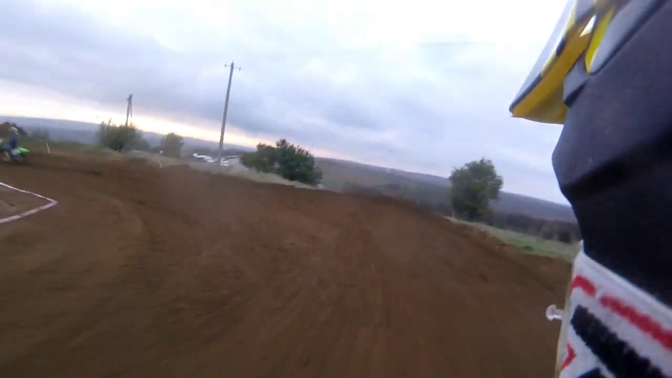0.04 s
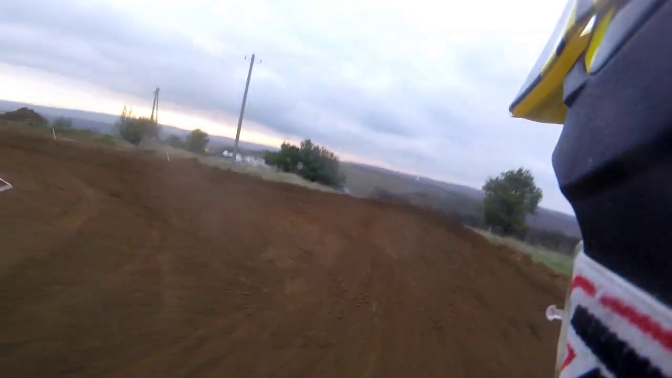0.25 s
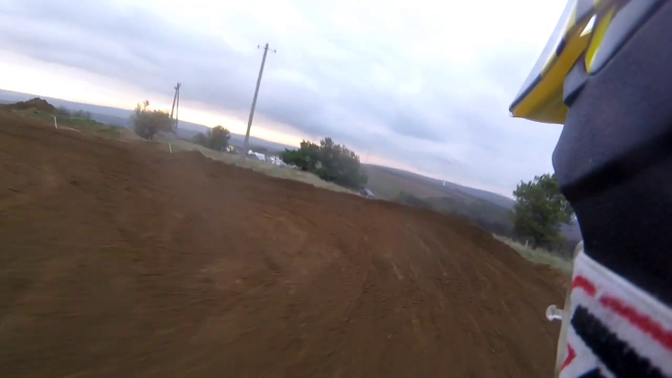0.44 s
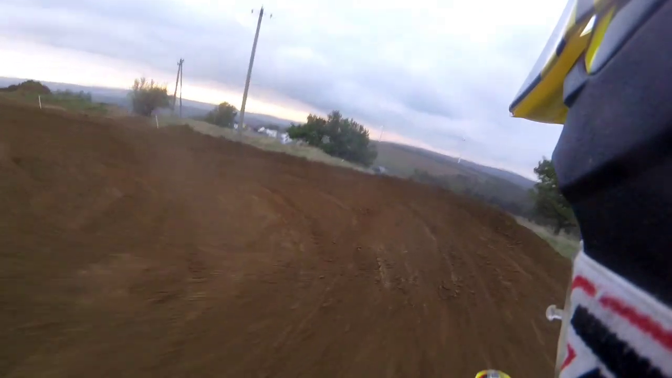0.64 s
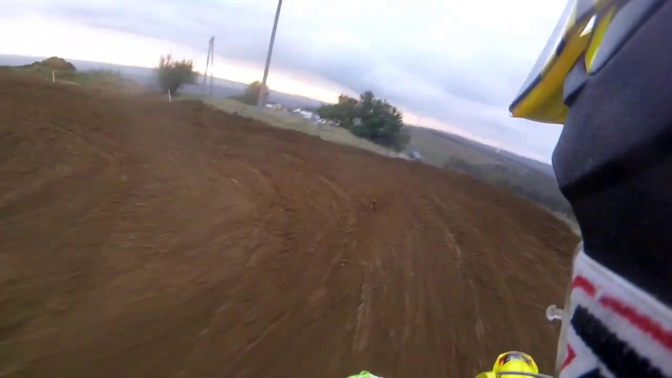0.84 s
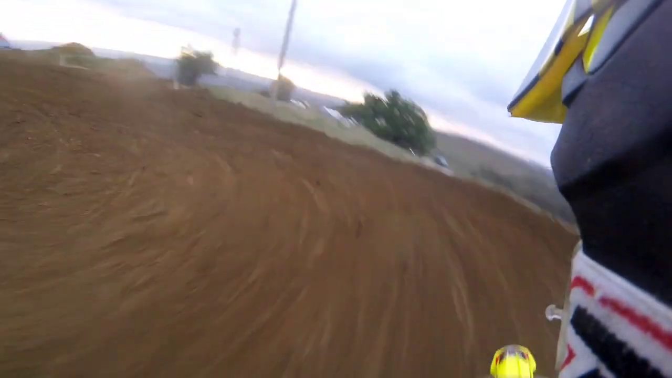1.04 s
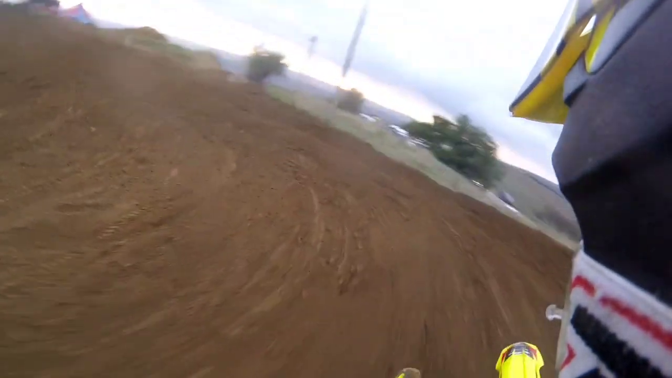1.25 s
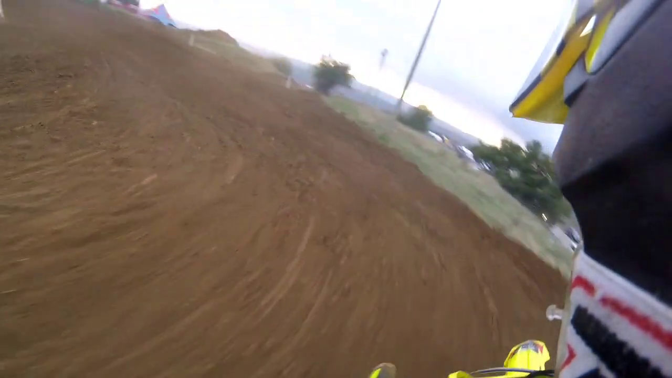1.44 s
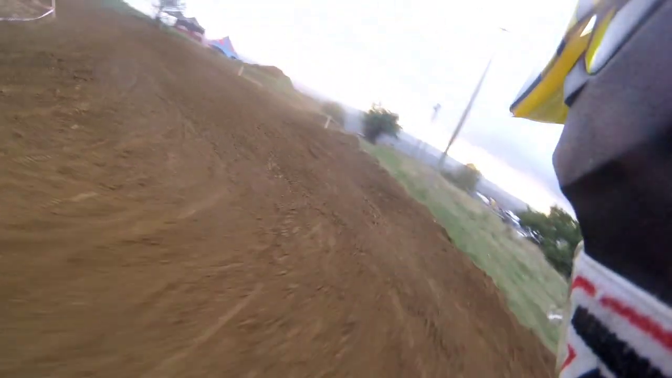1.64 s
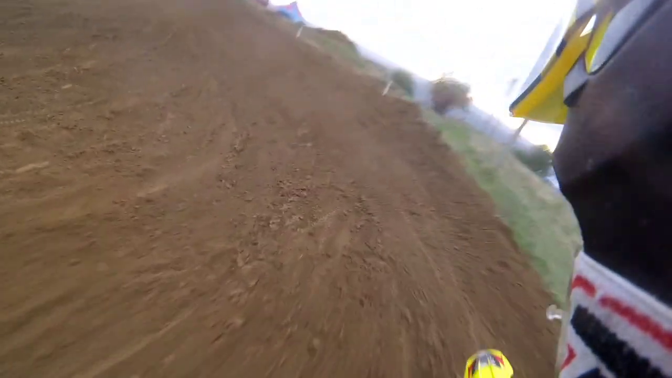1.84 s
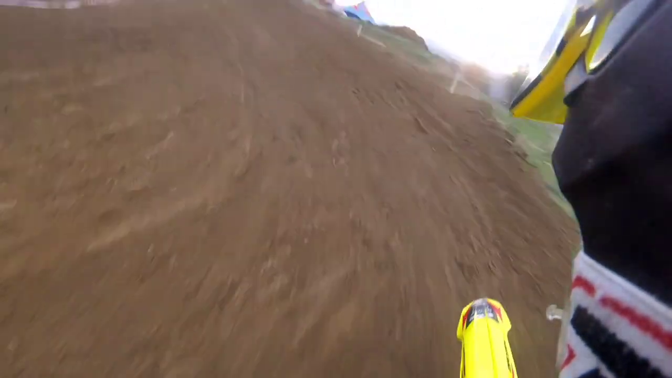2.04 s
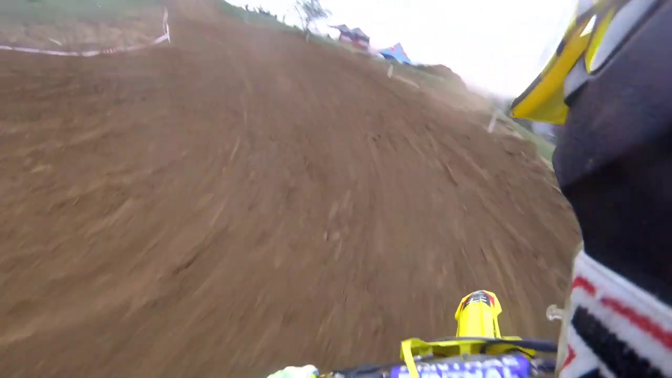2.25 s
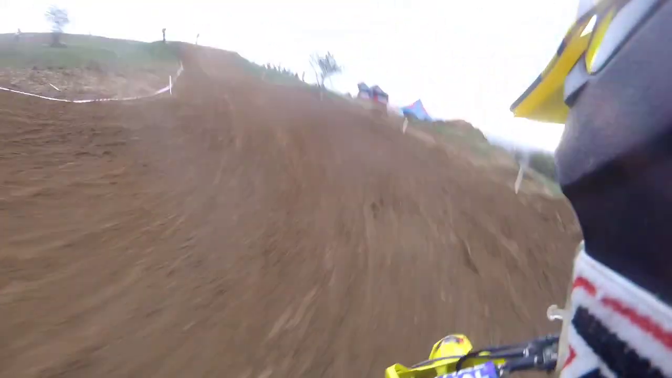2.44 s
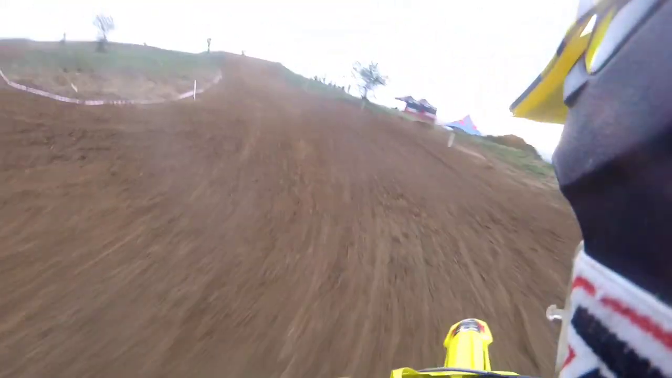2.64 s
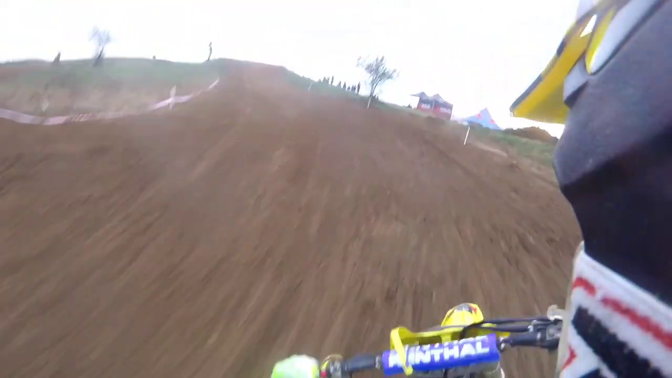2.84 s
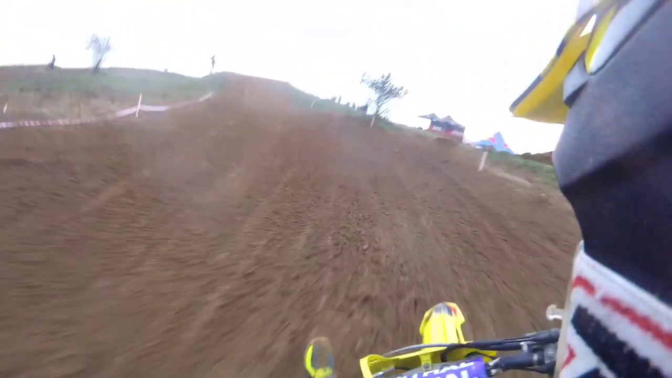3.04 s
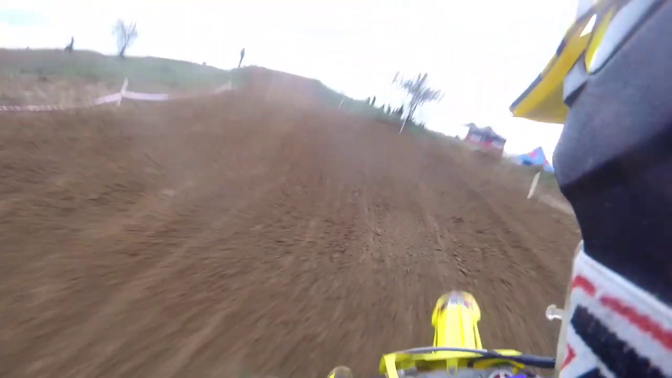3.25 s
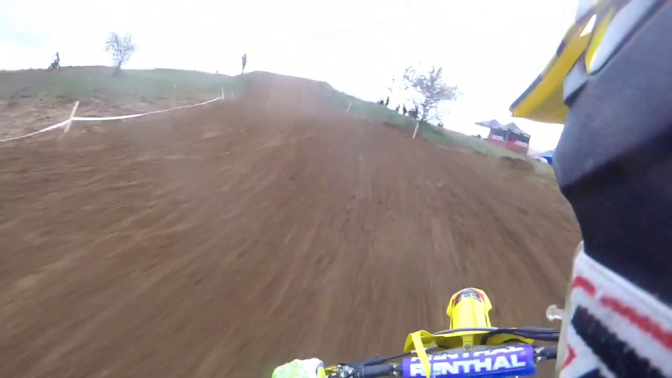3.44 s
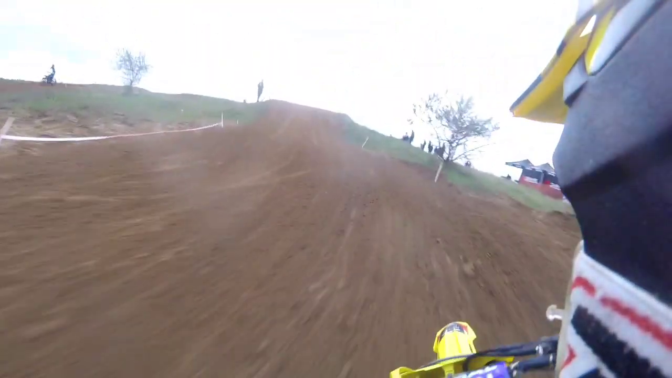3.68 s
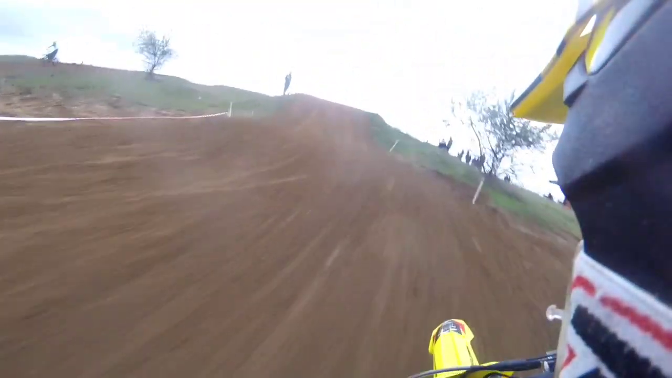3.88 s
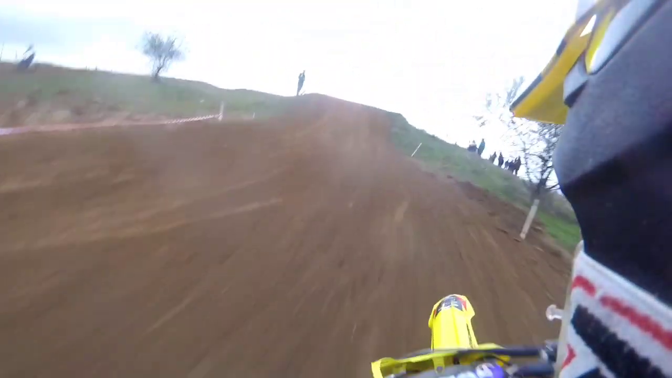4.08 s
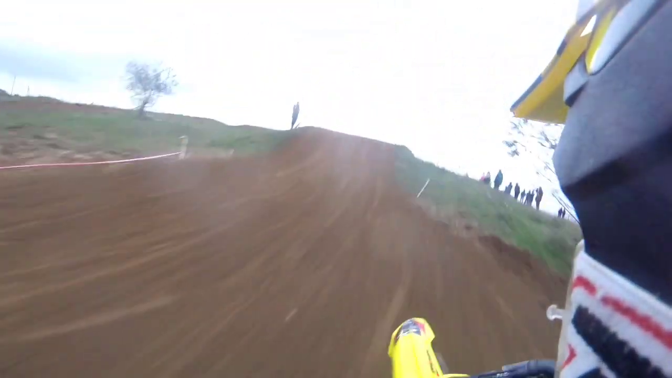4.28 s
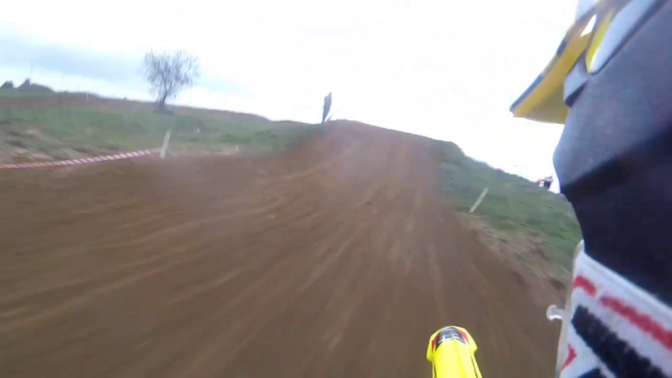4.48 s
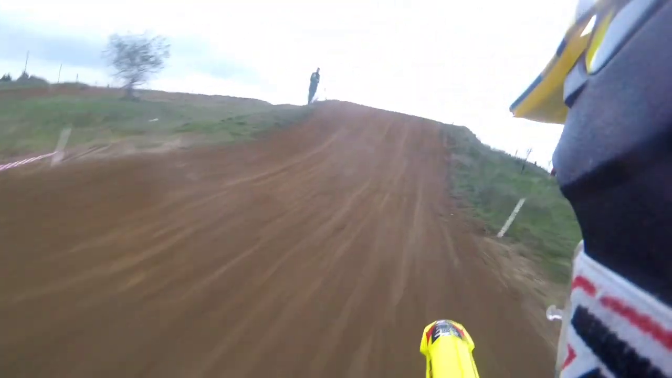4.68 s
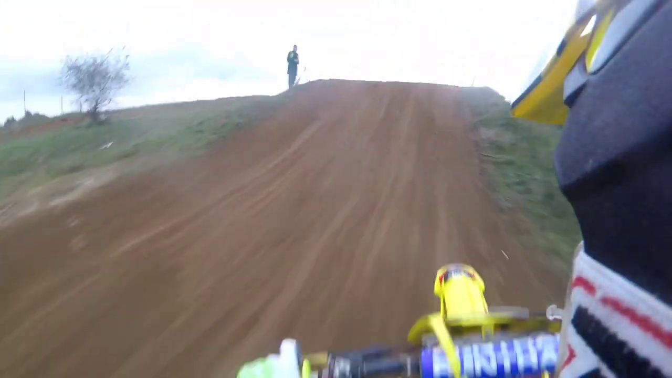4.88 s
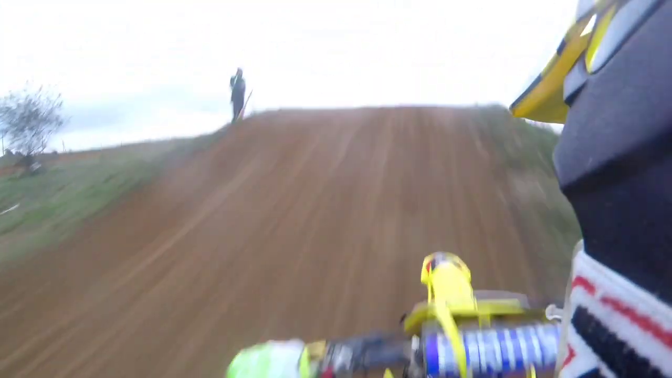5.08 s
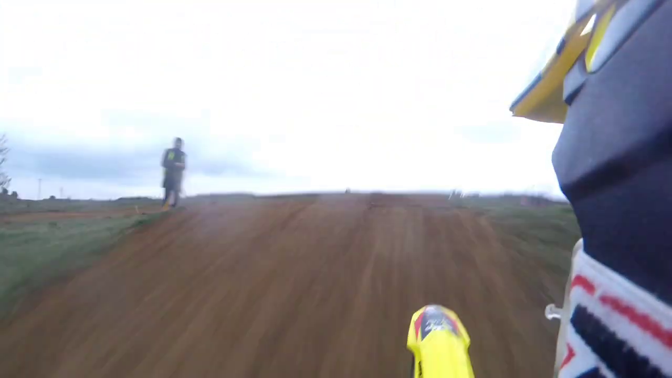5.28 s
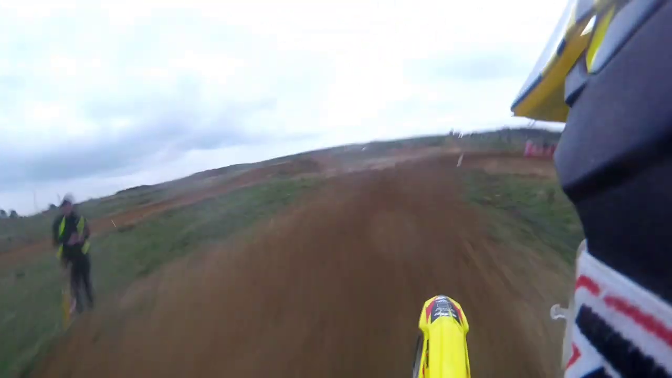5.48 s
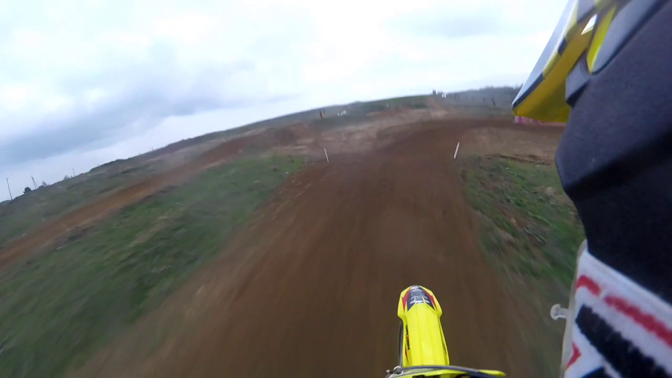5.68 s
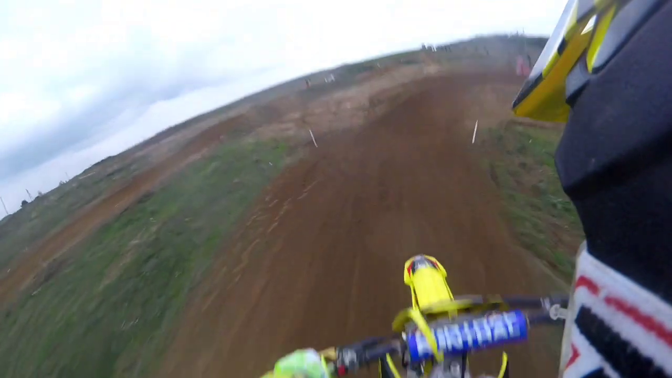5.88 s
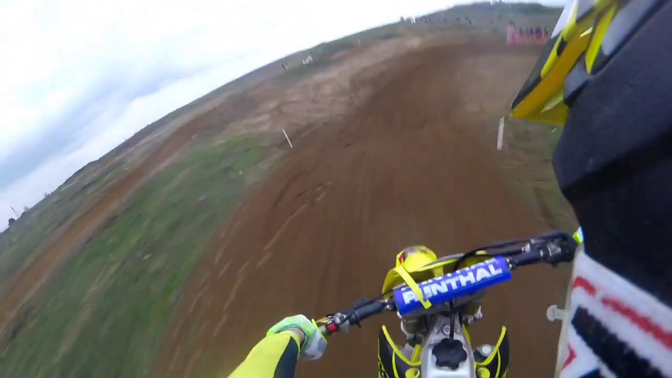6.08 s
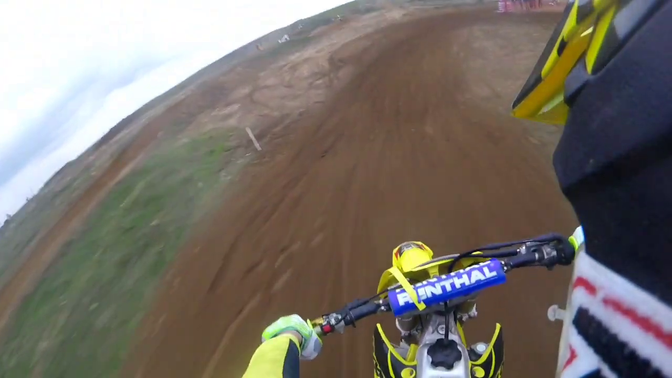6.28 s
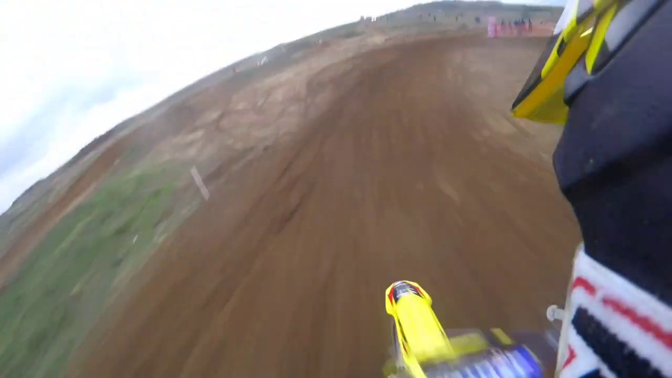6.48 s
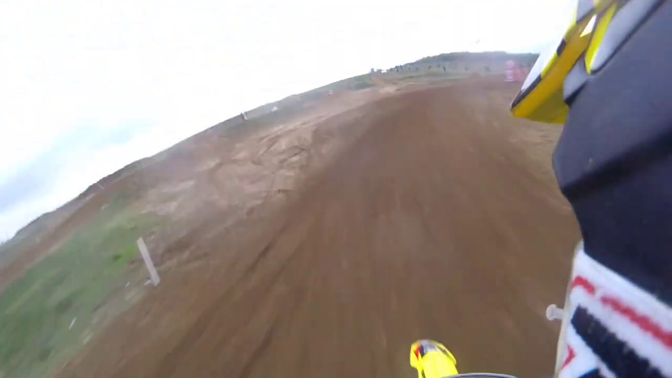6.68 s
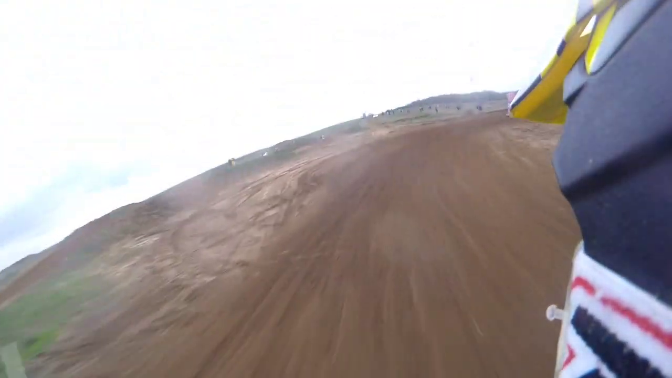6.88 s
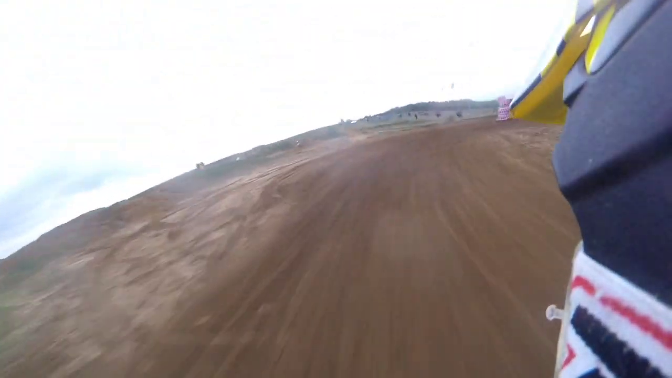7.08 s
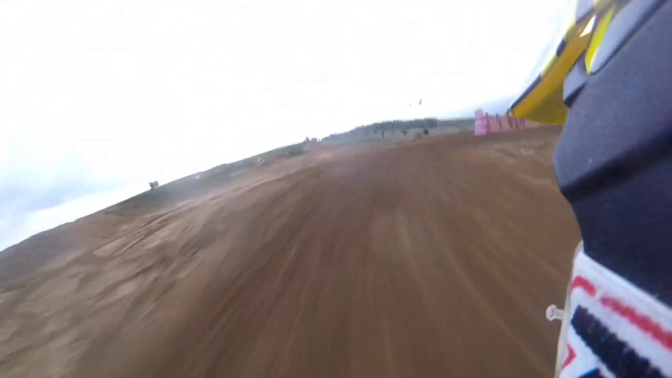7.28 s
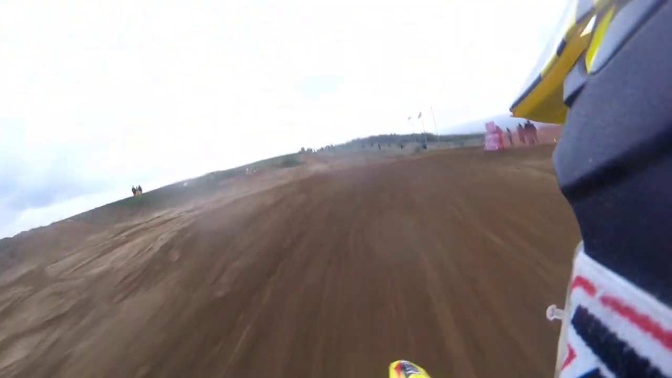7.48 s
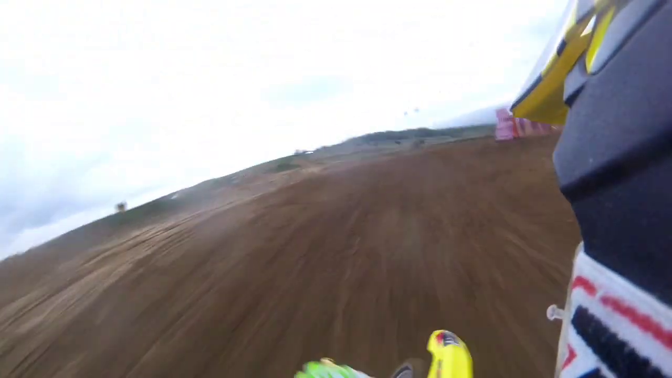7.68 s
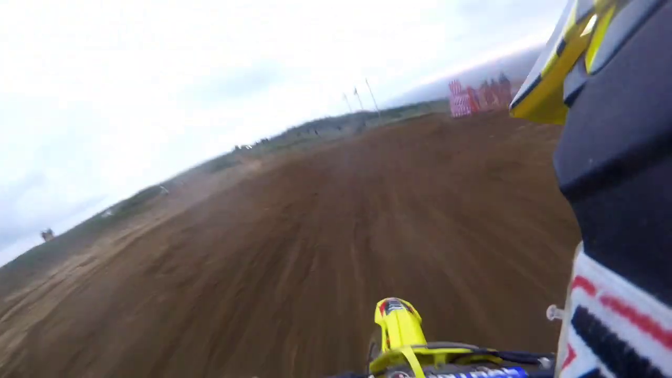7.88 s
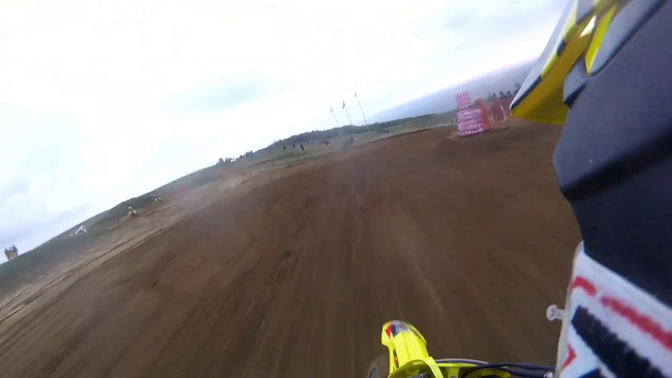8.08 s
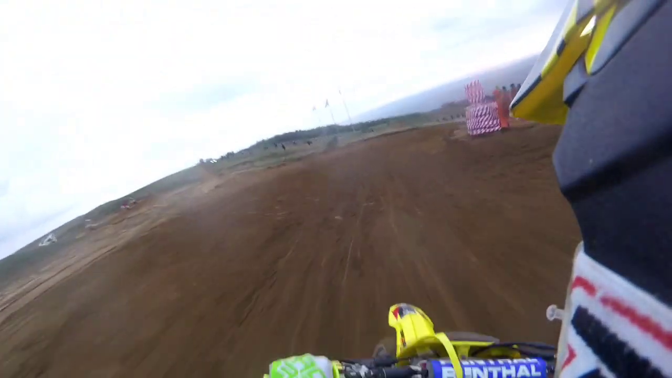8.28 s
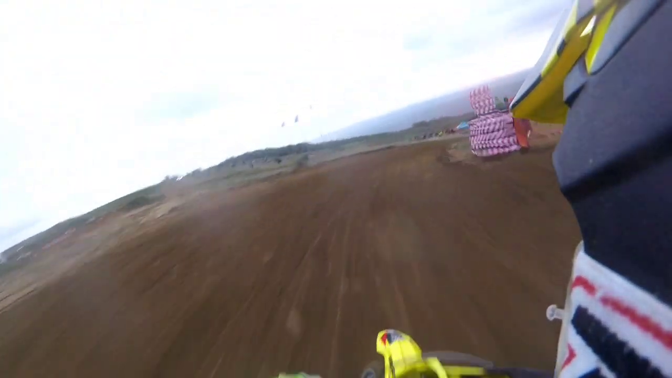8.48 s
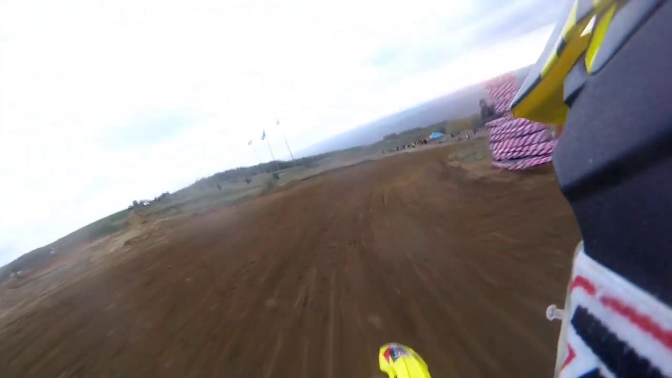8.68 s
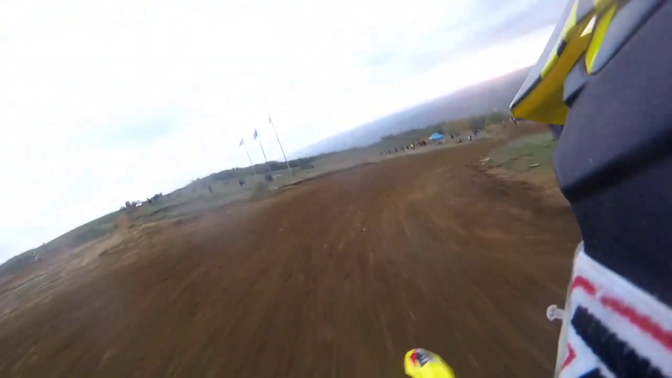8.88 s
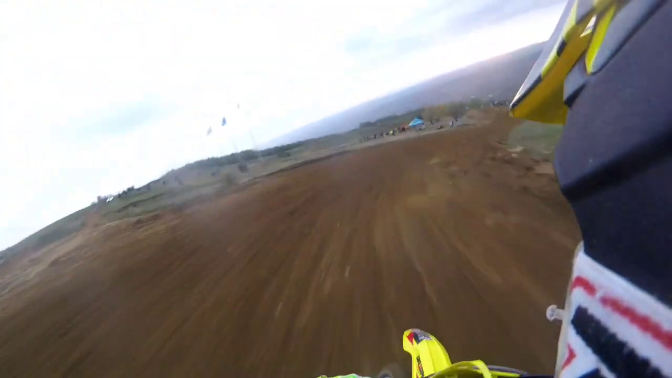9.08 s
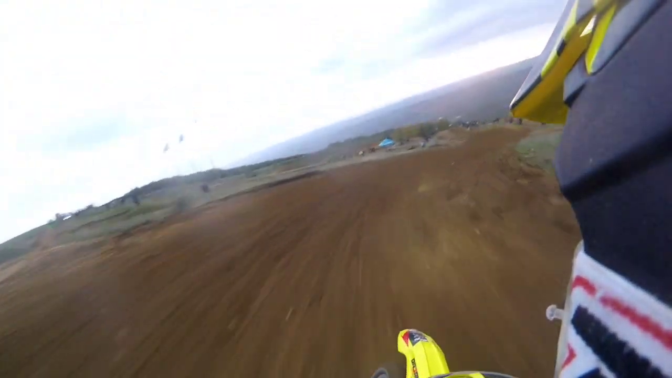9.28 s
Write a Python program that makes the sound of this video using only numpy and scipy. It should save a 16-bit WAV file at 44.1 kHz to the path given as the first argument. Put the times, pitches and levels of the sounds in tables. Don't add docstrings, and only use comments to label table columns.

```python
import sys
import numpy as np
from scipy import signal
from scipy.fft import rfft, irfft, next_fast_len
from scipy.io import wavfile
from scipy.ndimage import uniform_filter1d

SR = 44100
rng = np.random.default_rng(int(sys.argv[2]) if len(sys.argv) > 2 else 0)


def gain_from_db(level_db):
    decades = np.asarray(level_db, float) / 20
    return 10 ** decades


def dump(signal):
    limited = np.clip(np.atleast_2d(signal).T, -1, 1)
    pcm = np.round(limited * 32767).astype(np.int16)
    wavfile.write(sys.argv[1], SR, pcm)


N = 411453
T_S = np.arange(N) / SR


def noise():
    return rng.standard_normal(N)


def rms_one(x):
    return x / np.sqrt(np.mean(x ** 2) + 1e-20)


def at_peak(x, peak_db):
    return x * gain_from_db(peak_db) / x.max()


def evened(x, span_s=0.099):
    span = int(span_s * SR)
    power = uniform_filter1d(uniform_filter1d(x ** 2, span), span)
    return x / np.sqrt(np.abs(power) + 1e-12)


def in_time(rows):
    s, *columns = np.transpose(rows)
    return [np.interp(T_S, s, c) for c in columns]


def colour(x, spectrum):
    size = next_fast_len(N)
    hz = np.arange(size // 2 + 1) * SR / size + 1
    points = np.array(spectrum)
    gain_db = np.interp(np.log(hz), np.log(points[:, 0]), points[:, 1], left=-90, right=-90)
    return rms_one(irfft(rfft(x, size) * gain_from_db(gain_db), size)[:N])


def band(x, low_hz, high_hz, order=2):
    sos = signal.butter(order, [low_hz, high_hz], "band", fs=SR, output="sos")
    return signal.sosfilt(sos, x + 1e-18)


def centred(x, low_hz, high_hz, order=1):
    return band(band(x, low_hz, high_hz, order)[::-1], low_hz, high_hz, order)[::-1]


def muffled(x):
    return signal.sosfilt(signal.butter(3, 2500, fs=SR, output="sos"), x)


def resonance(x, hz, width_hz):
    r = np.exp(-np.pi * width_hz / SR)
    poles = [1, -2 * r * np.cos(2 * np.pi * hz / SR), r * r]
    return signal.lfilter([(1 - r * r) / 2, 0, (r * r - 1) / 2], poles, x + 1e-18)


def rung(x, hz, width_hz, second_width_hz):
    return resonance(resonance(x, hz, width_hz), hz, second_width_hz)


def drift(rate_hz):
    r = np.exp(-40 * np.pi * rate_hz / SR)
    slow = signal.lfilter([1], [1, -2 * r, r * r], rng.standard_normal(N // 20 + 4002))[4000:]
    return np.interp(np.arange(N) / 20, np.arange(len(slow)), rms_one(slow))


def pulses(cycles, uneven_db):
    passed = np.diff(np.floor(np.maximum.accumulate(cycles)), prepend=-1) > 0
    return passed * gain_from_db(uneven_db * drift(33))


def puffs(clicks, decay_s):
    return signal.lfilter([1], [1, -np.exp(-1 / (decay_s * SR))], clicks + 1e-18)


def struck(events):
    clicks = np.zeros(N)
    clicks[[round(s * SR) for s, db in events]] = gain_from_db(np.array(events)[:, 1])
    return clicks


def loudest_db(events):
    return max(db for s, db in events)


def speed_excess(per_s):
    return np.minimum(per_s, 72.0) - 60.0


# (dip time [s], dip speed [firings/s], peak time [s], peak speed [firings/s])
SPEED_SWINGS = [(0, 34.8, .165, 67.53), (.7, 32.68, .85, 38.39), (.97, 38.67, 1.15, 57.79),
                (1.513, 35.53, 1.871, 75.23), (2.054, 61.57, 2.169, 68.68), (2.469, 47.07, 2.754, 63.11),
                (2.894, 47.59, 3.246, 69.43), (3.47, 48.54, 3.71, 61.09), (3.805, 61.13, 4.13, 70.97),
                (4.25, 70.53, 4.354, 86.46), (4.473, 84.17, 4.714, 94.05), (4.847, 80.8, 4.929, 85.5),
                (5.015, 75.37, 5.055, 76.14), (5.11, 73.9, 5.601, 72.65), (5.921, 60.2, 6.0, 60.01),
                (6.06, 59.9, 6.381, 74.79), (6.398, 79.3, 6.584, 83.87), (6.75, 76.5, 6.8, 75),
                (8.0, 63, 8.13, 67), (9.2, 66, 9.34, 66)]


def speed():
    s, per_s = np.reshape(SPEED_SWINGS, (-1, 2)).T
    place = np.interp(T_S, s, np.arange(len(s)))
    k = np.minimum(place.astype(int), len(s) - 2)
    part, middle_s = place - k, (s[:-1] + s[1:]) / 2
    is_open = np.any([(middle_s > row[0]) & (middle_s < row[1]) for row in THROTTLE_TWISTS], axis=0)
    coasting = ~is_open & (np.diff(per_s) < 0)
    quick_drop = (part + np.sin(np.pi / 2 * part)) / 2
    smooth = (1 - np.cos(np.pi * part)) / 2
    return per_s[k] + np.where(coasting[k], quick_drop, smooth) * np.diff(per_s)[k]


# (open [s], shut [s], blow level [dB], pipe ring level [dB], ring level on the overrun after [dB])
THROTTLE_TWISTS = [(0, .165, -29.5, -17, -15), (.99, 1.13, -34, -29, -17.5), (1.36, 1.36, -50, -30, -25),
                   (1.57, 1.72, -32.5, -22, -19), (1.72, 1.895, -31.5, -25, -19),
                   (2.06, 2.21, -33.5, -17, -22), (2.21, 2.36, -34.5, -21, -22),
                   (2.36, 3.25, -34.5, -16, -22), (3.6, 3.84, -41, -18.5, -18),
                   (3.84, 4.76, -35.5, -13.5, -15), (4.76, 5.24, -42, -15, -23),
                   (6.25, 6.62, -47, -27, -28), (6.8, 7.22, -50, -31, -31), (7.45, 7.95, -50, -31, -28),
                   (7.99, 8.45, -47, -30, -34), (8.95, 9.4, -50, -33, -33)]


def throttle():
    roll_on_s, roll_on_db, twist_s = .07, -9, .05
    braking_per_s2, coast_db = 85.0, -15
    per_s, rows = speed(), np.array(THROTTLE_TWISTS)
    latest = np.maximum(np.searchsorted(rows[:, 0], T_S, "right") - 1, 0)
    _, shut_s, blow_db, ring_db, overrun_db = rows[latest].T
    is_open, fast = T_S < shut_s, speed_excess(per_s)
    blow_db = blow_db + roll_on_db * (1 - puffs(is_open, roll_on_s) / (roll_on_s * SR))
    braking = np.clip(-np.gradient(per_s) * SR / braking_per_s2, 0, 1)
    boom_db = np.where(is_open, ring_db, overrun_db + coast_db * (1 - braking) ** 2)
    bark_db = np.where(is_open, blow_db + 12 - .15 * fast, -42.5)
    crack_db = np.where(is_open, blow_db + .27 * fast, -57)
    wrist = int(twist_s * SR)
    return [per_s] + [uniform_filter1d(1. * c, wrist) for c in (is_open, boom_db, bark_db, crack_db)]


# (time [s], lag after firing [cycles])
INTAKE_LAG = [
    (0, .22),
    (1.62, .215),
    (1.75, .255),
    (1.9, .262),
    (2.05, .226),
    (4.25, .226),
    (4.4, .283),
    (6.3, .303),
]


def blows(per_s):
    lag = in_time(INTAKE_LAG)[0] + .0011 * (speed_excess(per_s) + 2)
    strength = 1 - .4 * np.clip((per_s - 68) / 10, 0, 1)
    cycles = np.cumsum(per_s) / SR - .0235 * per_s[0] + .0015 * drift(25)
    firing = pulses(cycles, uneven_db=1.0)
    intake = pulses(cycles - lag, uneven_db=.5) + .45 * pulses(cycles - 2 * lag, uneven_db=.5)
    both = firing + strength * intake
    share = .8 * np.clip((per_s - 50) / 15, 0, 1)
    overlap = np.diff(np.floor(cycles - .77), prepend=-2) > 0
    kicks = (1 - share) * (firing + both) / 2 + share * overlap
    return firing, both, kicks


def pipe_boom(firing, kicks, boom_db, crack_db):
    cold_hz, hot_hz = 159, 274
    hot = np.clip((crack_db - boom_db + 31) / 8, 0, 1) * np.clip((boom_db + 30) / 12, .2, 1)
    cold_ring = evened(rung(firing, cold_hz, 80, 140))
    hot_ring = evened(centred(resonance(kicks, hot_hz, 130), 165, 380, order=2))
    return gain_from_db(boom_db + 2.5) * (np.sqrt(1 - hot) * cold_ring + np.sqrt(hot) * hot_ring)


def exhaust_crack(per_s, firing, both, crack_db):
    spike = centred(firing + .35 * (both - firing), 450, 4000)
    spike = muffled(muffled(spike)[::-1])[::-1]
    spike = rms_one(spike) + .6 * rms_one(resonance(spike, 1480, 400))
    sharp = np.clip((per_s - 46) / 16, 0, 1)
    rounded = evened(centred(spike, 400, 2000))
    return gain_from_db(crack_db + 7) * (sharp * evened(spike) + (1 - sharp) * rounded)


# (time [s], low thump [dB], bark [dB], howl [dB], tailpipe ring [dB])
LOAD_VOICE = [(0, -2, -2, -7, -13), (.9, 0, -1, -10, -20), (1.55, -5, -1.5, -9, -20),
              (1.75, 1, -2, -7, -16), (1.9, 2, -2, -6, -16), (2.05, 0, -1, -9, -18),
              (2.3, -2, -.5, -12, -14), (3.25, -2, -1, -13, -14), (4.0, 0, -4, -8, -11),
              (5.3, 0, -4, -8, -12), (6.2, 3, -1, -2, -12), (6.35, 8, 3, 2.5, -4), (6.6, 8, 3, 2.5, -4),
              (6.8, 0, 2, -3, -16), (9.33, 0, 2, -3, -16)]


def exhaust(per_s, boom_db, bark_db, crack_db):
    firing, both, kicks = blows(per_s)
    low_db, mid_db, howl_db, tail_db = in_time(LOAD_VOICE)
    boom = pipe_boom(firing, kicks, boom_db, crack_db)
    suction = -np.roll(firing, round(.0027 * SR))
    thump = gain_from_db(bark_db + 4.5 + low_db) * evened(centred(suction, 35, 175))
    bark = evened(centred(resonance(both, 520, 400), 400, 670, order=2))
    bark = gain_from_db(bark_db + 2.5 + mid_db) * bark
    howl = evened(centred(resonance(both, 790, 300), 660, 1000, order=2))
    howl = gain_from_db(bark_db + 2.5 + howl_db) * howl
    tail = gain_from_db(crack_db + tail_db) * evened(rung(firing, 2680, 250, 350))
    crack = exhaust_crack(per_s, firing, both, crack_db)
    body = np.roll(boom + thump + bark + howl, -round(.0002 * SR))
    gas_gate = gain_from_db(crack_db) * evened(puffs(puffs(firing, 0.015), 0.00015))
    return body + crack + tail, gas_gate


# (start [s], length [s], flap level [dB], rumble level [dB])
GUSTS_ON_PORT = [(0, 0.25, -20, -34), (0.22, 0.55, -24, -23.5), (0.835, 0.42, -20.5, -24),
                 (1.25, 0.14, -29, -26.5), (1.61, 0.097, -28, -38), (1.72, .2, -23, -21),
                 (1.88, 0.19, -21, -33), (2.162, 0.46, -24, -18.5), (2.48, 0.14, -18, -17.5),
                 (2.6, 0.26, -17, -23.5), (2.794, 0.32, -16.5, -25.5), (3.136, 0.3, -16.5, -21),
                 (3.481, 0.3, -15.5, -19), (3.696, 0.36, -14.5, -27), (4.124, 0.71, -17, -26),
                 (4.246, 0.14, -17, -21), (4.887, 0.27, -18.5, -21), (5.222, 0.16, -15, -18.5),
                 (5.43, 0.33, -17, -19.5), (5.787, 0.21, -23, -23.5), (6.002, 0.17, -27, -28),
                 (6.16, 0.14, -25, -23.5), (6.576, 0.17, -23, -33), (6.79, 0.098, -12.5, -19.5),
                 (6.898, 0.15, -15.5, -24), (7.068, 0.161, -14.5, -22), (7.26, .3, -15.5, -23.5),
                 (7.572, 0.22, -16, -20), (7.811, .15, -16, -19.5), (8.058, .08, -29.5, -28.5),
                 (8.142, 0.055, -24, -30), (8.211, 0.042, -18, -28), (8.298, 0.079, -16, -24.5),
                 (8.418, 0.078, -18.5, -23.5), (8.546, 0.23, -17, -25), (8.751, 0.17, -23, -26),
                 (8.966, 0.17, -19, -28), (9.218, .2, -16.5, -18)]


def gusts():
    calm_db, rise_db_per_s, fall_db_per_s = -34, 250.0, 300.0
    t, out = T_S[::32], calm_db
    for s, length_s, *db in GUSTS_ON_PORT:
        before_s, after_s = np.maximum(s - t, 0), np.maximum(t - s - length_s, 0)
        out = np.maximum(out, np.c_[db] - rise_db_per_s * before_s - fall_db_per_s * after_s)
    return [np.interp(T_S, t, row) for row in out]


# (frequency [Hz], density [dB per Hz])
RUMBLE_SPECTRUM = [(15, -44), (25, -9.5), (40, -8.5), (65, -2.5), (110, -5.5), (150, -15), (250, -41.5)]
FLAP_SPECTRUM = [(70, -25.5), (110, -3.5), (160, 1), (240, -1), (400, -6.5), (700, -17), (1200, -39)]
ROAR_SPECTRUM = [(250, -22.5), (450, 3.5), (800, -1.5), (1400, -7.5), (2000, -13), (2900, -20.5),
                 (3900, -28), (5000, -29), (6000, -55)]
# (time [s], roar against flap [dB])
HELMET_FACING = [(0, -15.5), (.33, -9.5), (.45, -17), (1.0, -25), (1.47, -14.5), (1.7, -13.5), (2.5, -18),
                 (3.55, -19.5), (4.2, -14.5), (5.38, -14), (5.45, -23), (6.1, -20), (6.75, -17), (8.0, -14),
                 (9.33, -14.5)]


def wind(gas_gate, crack_db, flap_db, rumble_db, gust_db):
    facing_db, = in_time(HELMET_FACING)
    roar_db = 20 * np.log10(np.hypot(gain_from_db(flap_db + facing_db), gain_from_db(crack_db - 8)))
    eddies = colour(noise(), FLAP_SPECTRUM)
    flap = evened(band(np.expm1(0.3 * eddies), 55, 3500, order=1), 0.069)
    rumble = evened(colour(noise(), RUMBLE_SPECTRUM), 0.14)
    rumble = gain_from_db(rumble_db + 5.5 + 0.58 * gust_db) * rumble
    flare = gain_from_db(flap_db - 27 + gust_db) * np.exp(0.68 * eddies) + gain_from_db(9.0) * gas_gate
    roar = evened(band(flare * colour(noise(), ROAR_SPECTRUM), 272, 4060), 0.019)
    passing = swell_passing()
    flap = flap * (1 - .7 * passing)
    roar = roar * (1 + .6 * passing)
    return rumble + gain_from_db(flap_db + gust_db + 3.5) * muffled(flap) + gain_from_db(roar_db + 9.0) * roar


# (time [s], level [dB])
HISS_LEVEL = [(0, -58.5), (.39, -63), (.45, -70), (.99, -53.5), (1.15, -47.5), (1.55, -50.5), (1.84, -40),
              (4.6, -43.5), (5.35, -48.5), (5.95, -58), (6.2, -51.5), (6.47, -44), (6.68, -42.5),
              (6.71, -50), (7.3, -50.5), (7.8, -46), (8.85, -48.5), (9.33, -47)]


def hiss_level(per_s, opening):
    return in_time(HISS_LEVEL)[0] + 3 * opening + 0.1025 * speed_excess(per_s)


# (frequency [Hz], density [dB per Hz])
CASING_SPECTRUM = [(2060, -4), (3500, -13), (4370, -20), (4850, -17), (5550, -7), (6050, -13.5), (6290, -5),
                   (6570, -0.5), (7130, -4), (8980, -2), (9930, -8), (10500, -19.5), (11000, -24),
                   (14400, -48), (22000, -120)]


def valve_hiss(hiss_db):
    flicker_db = 0.86 * drift(12) + 0.93 * drift(170)
    return gain_from_db(hiss_db + 5.5 + flicker_db) * colour(noise(), CASING_SPECTRUM)


# (time [s], level [dB])
RATTLE_LEVEL = [
    (0, -52),
    (.05, -42),
    (.136, -43),
    (.2, -51),
    (.7, -50),
    (.98, -58.5),
    (1.052, -49),
    (1.15, -79),
    (1.3, -92),
]
# (frequency [Hz], density [dB per Hz])
RATTLE_SPECTRUM = [(600, -5), (1500, 3.5), (3500, 0.5), (4500, -7.5), (6100, 3), (7000, -0.5), (7800, -7.5),
                   (10000, -34)]


def rattle():
    rattle_db, = in_time(RATTLE_LEVEL)
    knobs = np.arange(N) * 54.0 / SR + .3 + .03 * drift(25)
    taps = rms_one(puffs(pulses(knobs, uneven_db=5.0), .005))
    return gain_from_db(rattle_db + 11.5) * (0.54 + 0.48 * taps) * colour(noise(), RATTLE_SPECTRUM)


# (time [s], coarse level, 3-6.1 kHz [dB], fine level, 10-11.2 kHz [dB])
HISS_BAND_LEVEL = [(0, -25, -48), (1.6, -35, -36), (1.8, -33.5, -24.5), (4.9, -36, -25), (5.1, -21, -48),
                   (6.0, -24, -45), (6.2, -16.5, -27), (6.7, -16.5, -35), (7.0, -20, -45), (8.0, -18, -48),
                   (9.33, -22, -48)]


def hiss_bands(hiss_db):
    grit, (coarse_db, fine_db) = noise(), in_time(HISS_BAND_LEVEL)
    coarse = gain_from_db(coarse_db) * rms_one(band(grit, 3000, 6100))
    fine = gain_from_db(fine_db) * rms_one(band(grit, 9950, 11200, order=4))
    return gain_from_db(hiss_db + 10.5) * (coarse + fine)


# (time [s], peak level [dB])
TICK_EVENTS = [(0.0393, -49), (0.074, -61), (0.354, -45), (0.6395, -56), (0.689, -40), (1.2256, -25),
               (6.142, -24), (6.6737, -24), (6.8056, -28.5), (6.939, -30), (7.1277, -29.5), (7.269, -32),
               (7.8153, -34), (7.9127, -30), (8.2916, -29), (8.9917, -31)]


def ticks():
    gate = puffs(puffs(struck(TICK_EVENTS), 0.0027), 0.0013) / 30
    return gain_from_db(-1.5) * gate * colour(noise(), CASING_SPECTRUM)


# (time [s], peak
# level [dB])
SLAP_EVENTS = [(1.039, -9), (1.083, -8), (3.55, -6), (5.804, -11), (8.294, -6), (4.958, -5), (5.092, -2),
               (5.099, -5), (5.178, -7), (5.313, -9), (5.373, -8), (5.748, -2), (5.814, -8), (5.918, -2),
               (6.677, -9), (7.081, -4), (7.121, -5), (7.678, -8), (7.718, -8), (8.328, -8), (8.587, -7),
               (8.999, -9), (9.26, -8), (7.059, -8), (7.208, -9), (7.531, -7), (7.781, -10), (8.223, -9),
               (8.544, -11), (8.979, -9)]


def slaps(flap_db, gust_db):
    burst_db = flap_db + gust_db - 1.0 + 3.0 * np.minimum(rng.exponential(1, N), 2)
    bursting = (rng.random(N) < 70 / SR) * gain_from_db(burst_db)
    lone = struck(SLAP_EVENTS)
    pressure = puffs(lone + bursting, .0006) + .3 * puffs(lone, .0004)
    return at_peak(muffled(band(pressure, 70, 1500, order=1)), loudest_db(SLAP_EVENTS) - .2)


# (time [s], peak level [dB])
SWELL_EVENTS = [(5.242, 0), (5.266, -3), (5.282, 2), (5.299, -4), (5.312, 0), (5.363, -12), (5.372, -2),
                (6.805, -6), (6.826, -1), (6.84, -6), (6.855, -13), (6.873, -3), (6.885, 1), (6.896, 2),
                (6.905, -7), (7.01, -2), (7.123, -9), (7.164, -5), (7.209, -10), (7.228, -2), (7.255, 3),
                (7.329, -1), (7.347, -5), (7.38, -5), (7.41, -6), (7.531, -1), (7.547, -8), (7.593, -5),
                (7.608, -4), (7.652, 0), (7.664, -13), (7.679, -6), (7.702, -2), (7.717, 1), (7.808, -1),
                (7.816, -5), (7.828, 1), (7.838, -14.5), (7.889, -3), (7.911, 4), (7.932, 2), (7.944, 4),
                (8.327, -6), (8.359, -6), (8.369, -5), (8.421, -6), (8.588, 1), (8.597, -4), (8.683, -8),
                (8.999, -1), (9.039, -7), (9.261, -4), (9.289, -1), (9.304, -2), (9.316, -6)]


def swell_passing():
    gate = puffs(puffs(struck(SWELL_EVENTS) > 0, .004), .001) / (.001 * SR)
    return np.minimum(3 * gate, 1)


def swells():
    return at_peak(resonance(puffs(puffs(struck(SWELL_EVENTS), 0.001), .0005), 185, 170), -1.5)


# (time [s], peak level [dB])
THUMP_EVENTS = [(5.747, -9), (5.917, -9), (6.007, -6), (8.76, -8), (6.18, -11), (6.197, -11), (6.214, -11),
                (6.23, -14), (6.255, -4), (6.293, -11), (6.331, -13)]


def landing_thumps():
    shocks = band(puffs(puffs(struck(THUMP_EVENTS), .0012), .0008), 60, 600)
    return at_peak(shocks, loudest_db(THUMP_EVENTS))


def scene():
    per_s, opening, boom_db, bark_db, crack_db = throttle()
    engine, gas_gate = exhaust(per_s, boom_db, bark_db, crack_db)
    flap_db, rumble_db = gusts()
    gust_db = .8 * drift(2) + 1.8 * drift(15.2)
    hiss_db = hiss_level(per_s, opening)
    air = wind(gas_gate, crack_db, flap_db, rumble_db, gust_db)
    air = air + slaps(flap_db, gust_db) + swells()
    machinery = valve_hiss(hiss_db) + rattle() + hiss_bands(hiss_db) + ticks()
    return (engine + air + machinery + landing_thumps())[None]


def treble_gate(x):
    hole_db, holes_from_hz = -13.5, 3600
    hz, _, z = signal.stft(x, SR, nperseg=2048)
    power = uniform_filter1d(np.abs(z) ** 2, size=6, axis=1)
    hiss = power[:, (hz > 6500) & (hz < 9500)].mean(axis=1, keepdims=True)
    kept = (power > gain_from_db(2 * hole_db) * hiss) | (hz < holes_from_hz)[:, None]
    return signal.istft(z * kept, SR, nperseg=2048)[1][:, :N]


def roll_off(x):
    return signal.sosfilt(signal.butter(12, 11190, fs=SR, output="sos"), x)


def record(dry):
    fade = np.minimum(np.minimum(np.arange(N)[::-1] / 300, np.arange(N) / 60), 1)
    mix = treble_gate(0.86 * np.tanh(fade * dry / 1.442))
    return roll_off(mix)


dry = scene()
out = record(dry)
dump(out)
```